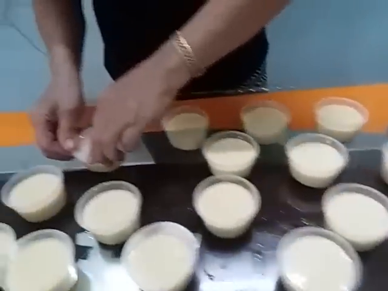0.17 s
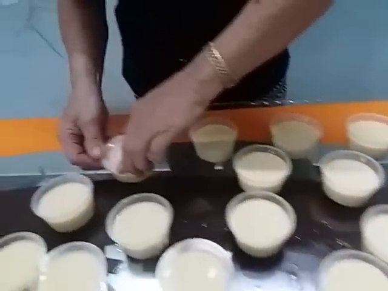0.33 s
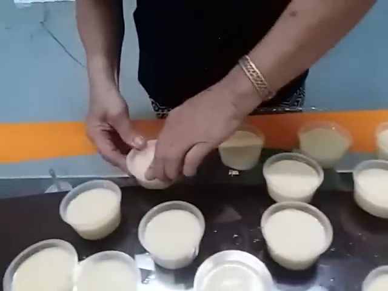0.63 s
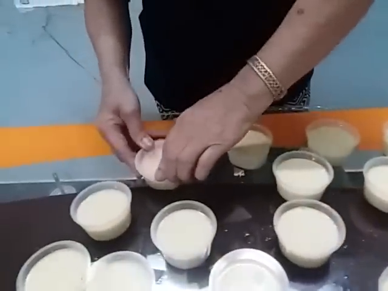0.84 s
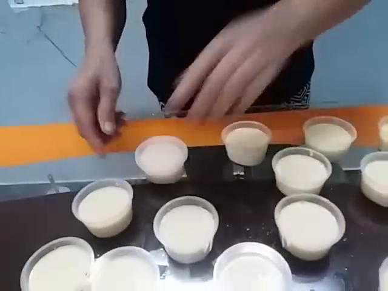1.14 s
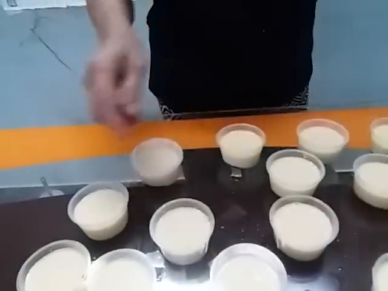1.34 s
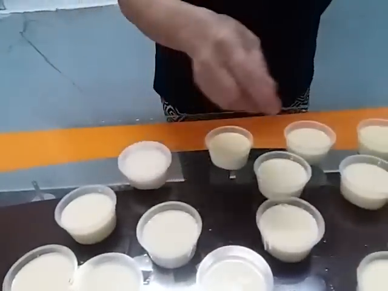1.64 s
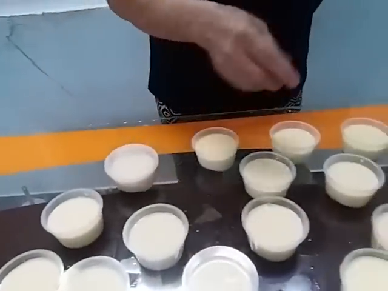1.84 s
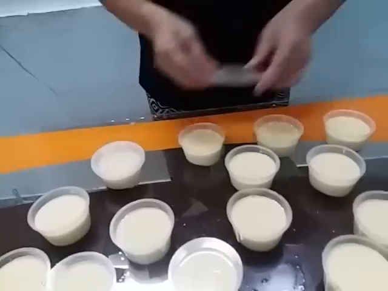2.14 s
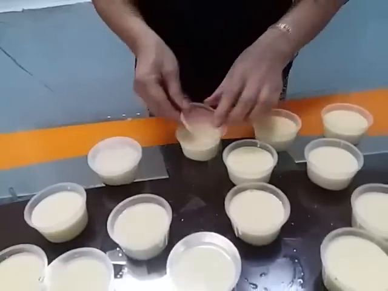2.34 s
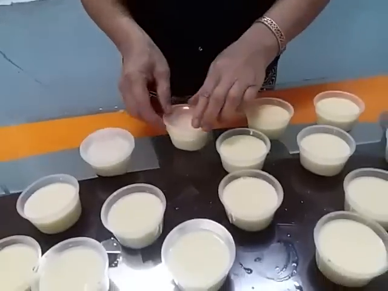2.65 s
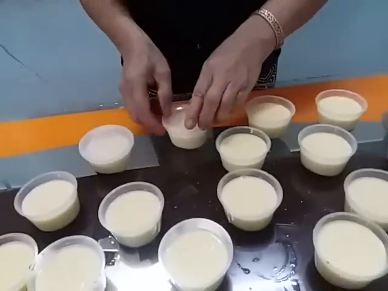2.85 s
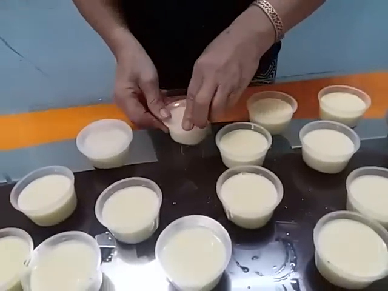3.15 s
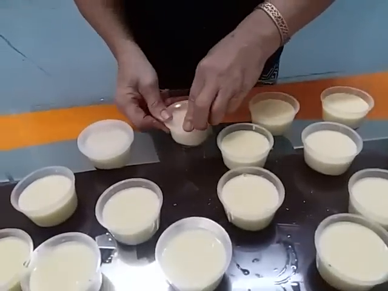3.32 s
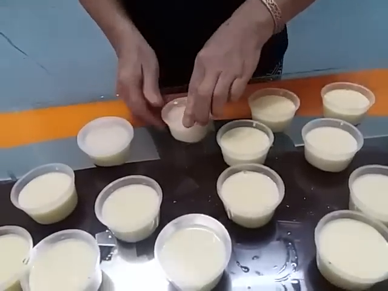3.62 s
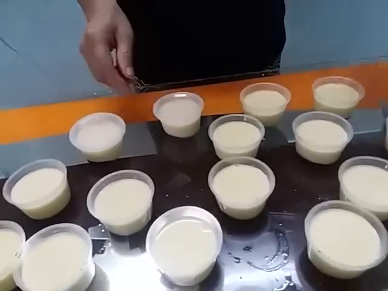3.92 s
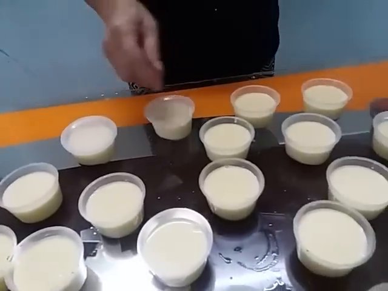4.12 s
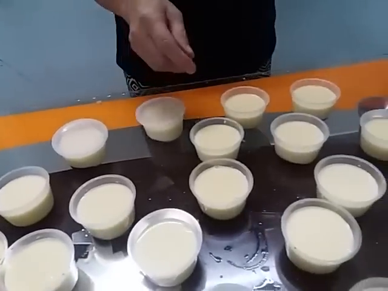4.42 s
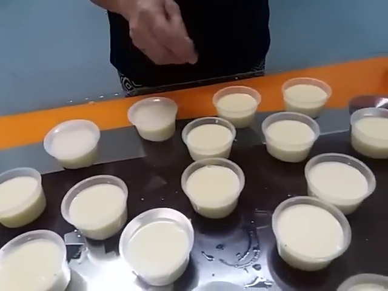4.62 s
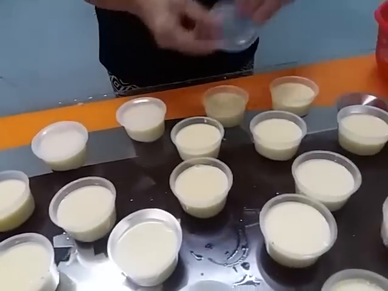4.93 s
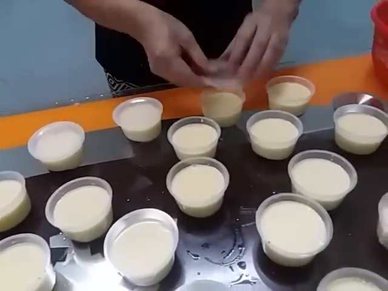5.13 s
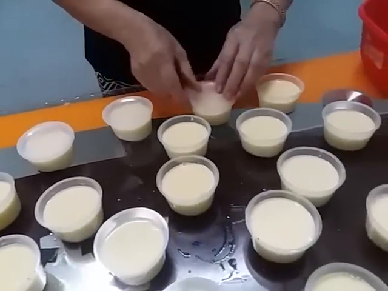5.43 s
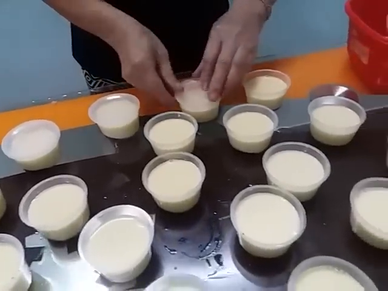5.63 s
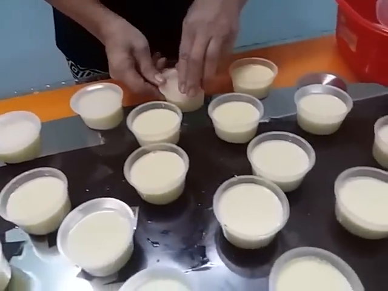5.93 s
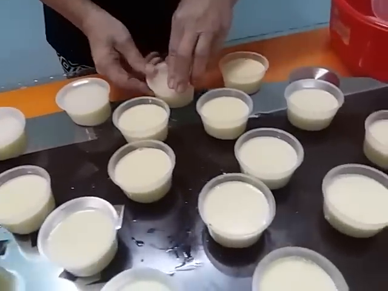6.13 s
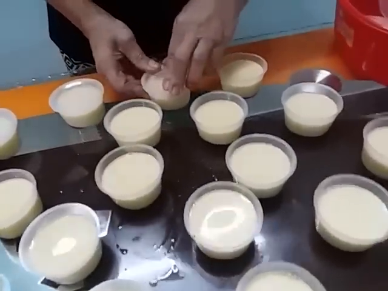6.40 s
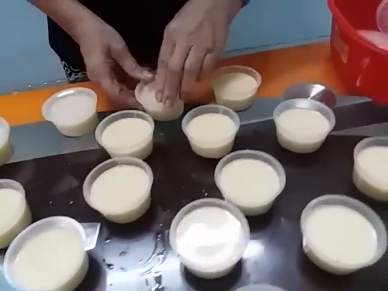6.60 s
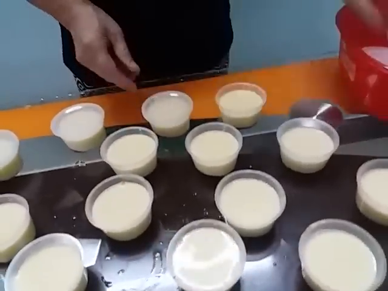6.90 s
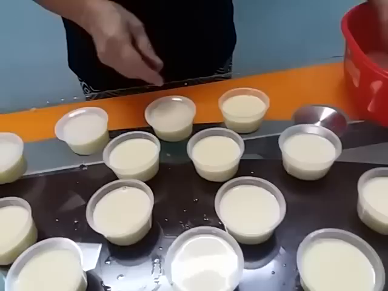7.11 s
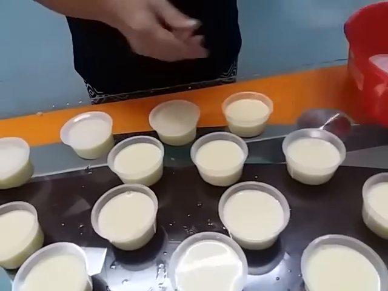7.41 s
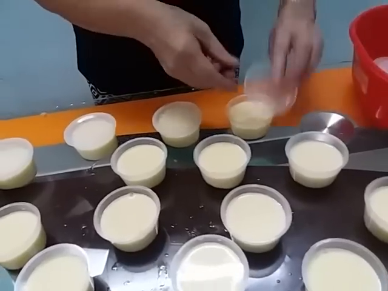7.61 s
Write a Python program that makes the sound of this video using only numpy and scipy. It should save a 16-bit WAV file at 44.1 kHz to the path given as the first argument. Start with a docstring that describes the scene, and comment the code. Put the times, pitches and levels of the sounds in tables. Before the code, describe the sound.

Close to the microphone, thin plastic lids snap onto small filled cups on a table. A sharp snap opens, smaller ticks follow, then a strong double snap just past three seconds. Loose lids clatter in a plastic basket after four seconds, the loudest burst of snaps comes near six and a half, and another basket rattle follows. A hard-walled kitchen echoes over a steady low fan drone.

```python
"""Thin plastic lids snap onto small cups on a table in a hard-walled kitchen, over a steady fan-like drone.
Each snap sums decaying modes of the lid, one leading ring and a noisy rim crack; low thumps join them. Farther
lids knock in a basket and loose lids rattle as random contacts; echoes and a noise tail add the room. The
background is coloured noise with resonant peaks, hiss and a wavering mains hum; a faint whine comes and goes."""
import sys
import numpy as np
from scipy import signal
from scipy.fft import rfft, irfft
from scipy.io import wavfile

SR = 44100
rng = np.random.default_rng(int(sys.argv[2]) if len(sys.argv) > 2 else 0)


def wav_record(signal):
    """Record a signal, one row per channel, as 16-bit PCM in the file named by sys.argv[1]."""
    frames = np.transpose(np.atleast_2d(signal))
    bounded = np.clip(frames, -1, 1)
    # unit amplitude maps onto the largest positive 16-bit level
    quanta = np.round(bounded * 32767).astype(np.int16)
    wavfile.write(sys.argv[1], SR, quanta)


def undo_db(level):
    """Turn decibels back into plain size, where 20 dB means ten times bigger."""
    steps = np.asarray(level, float) / 20
    return 10 ** steps


N = 342118   # length in samples


# lids snapping onto cups, close by: start_s, lid_level_db, cup_pitch_hz,
# cup_level_db [re lid], crack_level_db [re lid]
NEAR_SNAPS = [(0.0159, -46, 1580, 23.5, -32), (0.0496, -15, 1184, 4, -20.5), (0.0516, -19, 1610, 2, -26),
              (0.2155, -21.5, 1960, 8.5, -27), (0.2281, -18, 1160, 2, -32), (0.7477, -42.5, 1370, -5, -29),
              (1.1211, -20, 1620, -5.5, -27), (2.174, -38, 797, -7, -24), (2.4708, -37, 770, -2, -33),
              (2.4853, -32.5, 1060, -16, -40), (2.9257, -36.5, 1880, -18, -38), (2.9347, -35, 680, -1, -24),
              (3.221, -12.5, 1975, 4, -21.5), (3.224, -19, 790, 1.5, -21), (3.3213, -8.5, 1770, -4.5, -14),
              (3.3245, -15, 880, -1, -32), (3.6943, -37, 1650, -14, -25), (3.7641, -34.5, 785, -2, -38),
              (3.7836, -43, 1850, 9, -19), (5.372, -35.5, 640, -18, -39), (5.3817, -34.5, 872, -8, -30),
              (5.5044, -33, 1820, -13, -42), (5.5296, -31, 1790, 15.5, -32), (5.58, -42, 1780, 7, -20),
              (5.691, -30, 1460, 0, -39), (5.8448, -36.5, 920, 13.5, -46), (5.8596, -28.5, 855, 5, -32),
              (5.8666, -34.5, 842, 8, -13), (5.9707, -31.5, 1880, 1, -29), (6.2502, -40, 784, 4, -32),
              (6.4043, -30, 900, 9, -41), (6.4129, -28, 814, 4, -36), (6.4198, -9.5, 850, 3, -31),
              (6.4226, -9.5, 990, -11, -24.5), (6.4352, -3, 1400, 2, -28.5), (6.4497, -21, 1400, -15, -18),
              (6.4656, -17, 1820, 8.5, -32), (6.4858, -17.5, 1370, -13, -26),
              (6.528, -14.5, 1400, -26, -29), (6.769, -17.5, 744, 0, -33), (6.9212, -46, 1550, 13, -10.5)]
# colour of the crack of a rim on its cup: frequency_hz, level_db [relative]
RIM_COLOUR = [(2500, -38), (3300, 17), (4200, 4), (5200, 2.5), (6300, 3.5), (7200, 0.5), (7600, 3.5),
              (8200, -3), (10500, -12), (13000, -12), (16000, -15)]
LID_RING_HZ, LID_RING_SPREAD = 2380, 0.025   # mean pitch; spread as a fraction of it


def near_snaps():
    """Impulsive excitation: each snap rings lid, rim and cup; the lid's leading pitch varies a little by chance."""
    start_s, lid_db, cup_hz, cup_db, crack_db = np.transpose(NEAR_SNAPS)
    at = to_samples(start_s)
    lid_hz = LID_RING_HZ * (1 + LID_RING_SPREAD * rng.standard_normal(len(at)))
    out = lid_blows(at, lid_db, lid_hz, crack_db, RIM_COLOUR, t60=0.01)
    add_rings(out, at, lid_db + cup_db, cup_hz, t60=0.008)
    return out


# low thumps through the table: start_s, level_db
TABLE_THUMPS = [(0.0504, -13), (0.225, -28.5), (0.394, -35), (1.12, -36), (3.224, -18.5), (3.323, -21.5),
                (4.259, -31), (4.5, -40), (4.674, -30), (4.857, -49), (5.86, -33.5), (6.428, -19),
                (6.435, -22.5), (6.767, -26), (7.167, -23.5), (7.204, -30), (7.318, -27)]
# modes of table top and filled cups: frequency_hz, level_db [re thump], t60_s
TABLE_MODES = [(147, -13, 0.041), (273, -4, 0.012), (422, -10, 0.052), (657, -6.5, 0.015),
               (842, -11.5, 0.0082)]


def table_thumps():
    """Modal response: a soft thump excites the low modes of the table top and the filled cups."""
    start_s, level_db = np.transpose(TABLE_THUMPS)
    return strike(TABLE_MODES, to_samples(start_s), level_db, contact_hz=1240)


# lids knocking in the basket at the far end of the table: start_s, ring_level_db, ring_pitch_hz,
# basket_level_db [re ring], crack_level_db [re ring]
BASKET_KNOCKS = [(1.702, -36.5, 2520, -7, -19), (1.7778, -37.5, 2540, -3, -19), (4.24, -43, 2500, -1, -20),
                 (4.2645, -16, 2415, -9, -34), (4.3077, -18.5, 2450, -15, -17.5),
                 (4.476, -25.5, 2520, -10.5, -17), (4.502, -18, 2480, -5.5, -21),
                 (4.595, -31, 2660, -9, -10.5), (4.6774, -15, 1990, -12, -21),
                 (4.6894, -23, 2280, -31, -44), (4.7024, -22.5, 2090, -14, -40),
                 (4.814, -26, 2510, -20, -30), (4.8596, -28, 1970, -5, -21.5),
                 (4.9343, -34.5, 2260, -6, -19.5), (7.1423, -26, 2170, -13, -19),
                 (7.151, -20.5, 2350, -5, -21), (7.1659, -15, 2316, -27, -19.5),
                 (7.1806, -17.5, 2217, -36, -27), (7.1914, -18, 2170, -16, -22),
                 (7.2015, -26.5, 2100, 2.5, -33), (7.2333, -25, 2110, -22, -19),
                 (7.2790, -23.5, 3000, -21, -19), (7.3219, -22, 2210, -7, -22.5),
                 (7.3444, -40, 2200, -20, -12), (7.3806, -30, 2110, -6.5, -10.5),
                 (7.3960, -36, 2200, -6, -10), (7.46, -27.5, 2170, -13, -14.5),
                 (7.5877, -42, 2120, -25, -30)]
# modes of the basket: frequency_hz, level_db [re basket blow], t60_s
BASKET_MODES = [(615, -7.5, 0.017), (1022, -3.5, 0.015), (1780, -2, 0.0027)]
# colour of the crack of loose rims: frequency_hz, level_db [relative]; the rattles use it too
LOOSE_RIM_COLOUR = [(2500, -53), (3300, 16), (4200, 3.5), (5500, 4), (7000, -4.5), (9000, -11.5),
                    (11000, -22), (16000, -24)]


def basket_knocks():
    """Modal superposition: each knock excites both the lid and the modes of the basket that holds it."""
    start_s, ring_db, ring_hz, basket_db, crack_db = np.transpose(BASKET_KNOCKS)
    at = to_samples(start_s)
    lids = lid_blows(at, ring_db, ring_hz, crack_db, LOOSE_RIM_COLOUR, t60=0.014)
    return lids + strike(BASKET_MODES, at, ring_db + basket_db, contact_hz=3000)


# loose lids rattling: start_s, length_s, swell_level_db [smallest contact, at the height of the swell],
# ring_pitch_hz [centre], treble_level_db [re ring]
LID_RATTLES = [(1.685, .29, -48, 2590, -19), (2.858, 0.12, -55, 2180, -33), (4.229, 0.14, -42, 2495, -10),
               (4.371, 0.42, -46, 2410, -13.5), (5.488, 0.12, -50, 1827, -33),
               (5.84, .11, -43.5, 2000, -38), (6.401, 0.18, -38, 1590, 0), (7.142, .12, -41, 2324, -10),
               (7.321, 0.26, -43, 2140, -13)]
# a rattle swells quickly, then fades over its length
RATTLE_RISE_S, RATTLE_RISE_DB, RATTLE_FALL_DB = 0.034, 17, 18


def rattles(per_s=200.0):
    """Stochastic impacts: many small uneven contacts between loose lids ring near the pitch of the stack."""
    t = np.arange(N) / SR
    touch = rng.random(N) < per_s / SR
    size_db = 4.0 * np.minimum(rng.exponential(1, N), 3)
    detune = 1 + 0.097 * rng.standard_normal(N)
    contacts = []
    for start, length, swell_db, hz, treble_db in LID_RATTLES:
        at = np.flatnonzero(touch & (t >= start) & (t < start + length))
        shape_db = np.interp(t[at] - start, [0, RATTLE_RISE_S, length],
                             [-RATTLE_RISE_DB, 0, -RATTLE_FALL_DB])
        for i, db in zip(at, shape_db):
            contacts.append((i, swell_db + db + size_db[i], hz * detune[i], treble_db))
    at, db, hz, treble_db = np.transpose(contacts)
    at = at.astype(int)
    out = strike(LID_MODES, at, db - 8, contact_hz=3300)
    out += crack(at, db + treble_db, LOOSE_RIM_COLOUR)
    add_rings(out, at, db, hz, t60=0.032)
    return out


# modes of a lid on a cup, also struck by the rattles: frequency_hz, level_db [re blow], t60_s
LID_MODES = [(860, -4.5, 0.005), (1240, -11.5, 0.015), (1620, -4, 0.016), (2090, 10, 0.006),
             (2439, 10.5, 0.0034), (2910, -21, 0.036)]


def lid_blows(at, db, hz, crack_db, colour, t60):
    """Modal superposition: all modes of the lid, one ring that leads, and the crack of the rim."""
    out = strike(LID_MODES, at, db - 10.5, contact_hz=3430)
    out += crack(at, db + crack_db, colour)
    add_rings(out, at, db, hz, t60)
    return out


def add_rings(out, at, db, hz, t60):
    """Free decay after buckling: the wall lets go in about half a millisecond and rings at its own pitch."""
    t = np.arange(1500) / SR
    envelope = (1 - np.exp(-t / 0.00026)) ** 2 * undo_db(-60 * t / t60)
    for i, gain, pitch in zip(at, undo_db(db), hz):
        tone = gain * envelope * np.sin(2 * np.pi * pitch * t)
        out[i:i + len(t)] += tone[:N - i]


def crack(at, db, colour):
    """Stick-slip: the rim lets go in one sharp slip and a flurry of tiny ones, just before the lid rings."""
    t = np.arange(200) / SR
    slips = np.zeros(N + len(t))
    noises = rng.standard_normal((len(at), len(t)))
    for i, gain, noise in zip(at - 10, undo_db(db), noises):   # 10 samples ahead of the ring
        slips[i] += 8.14 * gain
        slips[i:i + len(t)] += gain * noise * np.exp(-t / 0.0015)
    return colour_spectrum(slips[:N], colour)


def strike(modes, at, db, contact_hz):
    """Modal excitation: each blow drives every mode a little differently; soft contact low-passes the click."""
    out = np.zeros(N)
    luck_db = 2.5 * rng.standard_normal((len(at), len(modes)))
    for k, (hz, level_db, t60) in enumerate(modes):
        polarity = (-1) ** k
        clicks = np.zeros(N)
        np.add.at(clicks, at, undo_db(db + level_db + luck_db[:, k]) * polarity)
        out += ring(clicks, hz, t60)
    return signal.sosfilt(signal.butter(4, contact_hz, fs=SR, output="sos"), out)


def ring(drive, hz, t60):
    """Damped resonator: a unit click sets a decaying sine of starting height 1 ringing."""
    radius, angle = undo_db(-60 / (t60 * SR)), 2 * np.pi * hz / SR
    feedback = [1, -2 * radius * np.cos(angle), radius * radius]
    return signal.lfilter([0, np.sin(angle)], feedback, drive + 1e-18)   # offset avoids denormals


# decay and colour of the room tail: frequency_hz, t60_s, level_db [relative]
ROOM_DECAY = [(147, 0.66, 0), (504, 0.45, 0.5), (1400, 0.68, 3.5), (2510, 0.54, -3.5), (3350, 0.69, -4.5),
              (9500, 0.6, -0.5), (15000, 0.14, 2)]
# reflections from table top and near wall: delay_s, level_db [re sound sent to the room]
EARLY_ECHOES = [(.0035, -7), (.0058, -18)]


def kitchen(send):
    """Reverberation: early echoes, then a dense tail of noise that dies band by band."""
    hz, t60, level_db = np.transpose(ROOM_DECAY)
    t = np.arange(SR) / SR
    tail = np.zeros(SR)
    edges = 80 * 2 ** np.arange(0, 7.8, 0.5)   # half-octave bands
    for low, high in zip(edges, edges[1:]):
        band_filter = signal.butter(2, [low, high], "band", fs=SR, output="sos")
        band = signal.sosfilt(band_filter, rng.standard_normal(SR))
        mid = np.sqrt(low * high)
        tail += band * undo_db(at_hz(mid, hz, level_db) - 60 * t / at_hz(mid, hz, t60))
    tail *= undo_db(-32) * np.clip((t - 0.003) / 0.0024, 0, 1)   # reflections thicken over the first milliseconds
    for delay, echo_db in EARLY_ECHOES:
        tail[round(delay * SR)] += undo_db(echo_db)
    return signal.fftconvolve(send, tail)[:N]


# faint thin whine: start_s, end_s, pitch_hz, level_db [rms between the fades]
WHINE_TONES = [(4.15, 4.266, 1714, -57.5), (6.276, 6.43, 1690, -59.5)]


def whine():
    """Phase modulation: random phase drift slightly roughens a tone that swells and fades."""
    out, t = np.zeros(N), np.arange(N) / SR
    for start, end, hz, db in WHINE_TONES:
        fade = np.clip(np.minimum(t - start, end - t) / 0.03, 0, 1)
        phase = 2 * np.pi * hz * t + 1.5 * drift(12.0)
        out += np.sqrt(2) * fade * undo_db(db) * np.sin(phase)
    return out


# spectrum of drone and microphone hiss: frequency_hz, level_db [per Hz, relative]
DRONE_SPECTRUM = [(24, -37), (40, -1.5), (69, -22), (91, -12), (167, -19.5), (199, 1.5), (231, -8.5),
                  (412, -8), (503, -13.5), (852, -12), (1270, -15.5), (1410, -22.5), (2320, -14),
                  (3930, -45.5), (16000, -40)]
# level of that noise over time: time_s, level_db [rms]
DRONE_LEVEL = [(0, -51), (0.7, -50.5), (1.5, -52.5), (1.6, -54.5), (1.7, -52.5), (3.9, -53), (4.2, -51),
               (7.76, -51.5)]
# resonant peaks in the background noise: frequency_hz, width_hz, level_db [rms before wavering]
BACKGROUND_RESONANCES = [(138.3, 35, -57), (899, 17, -71.5), (1310, 57, -84), (1740, 360, -65.5),
                         (2347, 130, -68)]
# hum of a mains-driven motor: frequency_hz, level_db [rms before wavering]
MOTOR_HUM = [(100, -61.5), (200, -79), (300, -63.5)]


def drone(patchy_db=2.0):
    """Filtered noise and harmonics: coloured noise, noise-driven resonances and a wavering hum."""
    t = np.arange(N) / SR
    noise = unit_rms(colour_spectrum(rng.standard_normal(N), DRONE_SPECTRUM))
    time_s, level_db = np.transpose(DRONE_LEVEL)
    out = noise * undo_db(np.interp(t, time_s, level_db))
    for hz, width_hz, db in BACKGROUND_RESONANCES:
        resonance = ring(rng.standard_normal(N), hz, 2.2 / width_hz)   # t60 from bandwidth
        out += undo_db(db + patchy_db * drift(2.7)) * unit_rms(resonance)
    for hz, db in MOTOR_HUM:
        phase = 2 * np.pi * hz * t + 0.22 * drift(0.96) + rng.uniform(0, 2 * np.pi)
        out += np.sqrt(2) * undo_db(db + 2.0 * drift(4.0)) * np.sin(phase)
    return out


def drift(rate_hz):
    """Low-passed noise: slow chance of unit rms, joined from 40 random knots a second."""
    knots = rng.standard_normal(int(N / SR * 40) + 300)
    memory = np.exp(-2 * np.pi * rate_hz / 40)
    slow = signal.lfilter([1], [1, -memory], knots)[200:]   # skip the settling
    return np.interp(np.arange(N) / SR * 40, np.arange(len(slow)), unit_rms(slow))


def colour_spectrum(x, colour):
    """Linear filtering: weight the spectrum by a table of frequency and level, leaving phase alone."""
    f = np.maximum(np.fft.rfftfreq(N, 1 / SR), 10)
    hz, level_db = np.transpose(colour)
    return irfft(rfft(x) * undo_db(at_hz(f, hz, level_db)), N)


def at_hz(hz, points, values):
    """Logarithmic pitch scale: interpolate a table along log frequency."""
    return np.interp(np.log(hz), np.log(points), values)


def unit_rms(x):
    """Power normalisation: scale to unit rms."""
    return x / np.sqrt(np.mean(x ** 2) + 1e-20)


def to_samples(start_s):
    """Uniform sampling: round times in seconds to sample numbers."""
    return np.round(start_s * SR).astype(int)


def scene():
    """Superposition: direct sounds and their reverberation add to the drone and whine."""
    near = near_snaps() + table_thumps()
    far = basket_knocks()
    loose = rattles()
    # how much of each reaches the microphone by the walls
    send = undo_db(-1) * near + undo_db(4.5) * far + undo_db(0.5) * loose
    return (near + far + loose + kitchen(send) + drone() + whine())[None]


def band_limit(x):
    """A steep low-pass at the top of the band."""
    return signal.sosfilt(signal.butter(12, 16600, fs=SR, output="sos"), x)


def record(dry):
    """Band limiting and saturation: the microphone drops deep bass and the very top, and rounds loud peaks."""
    heard = signal.sosfilt(signal.butter(4, 60, "high", fs=SR, output="sos"), dry)
    heard = signal.sosfilt(signal.cheby2(12, 30, 16000, fs=SR, output="sos"), heard)
    mix = 1.048 * np.tanh(heard / 0.81)
    return band_limit(mix)


dry = scene()
out = record(dry)
wav_record(out)
```